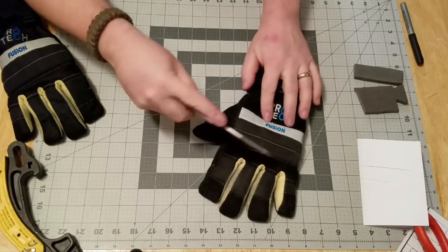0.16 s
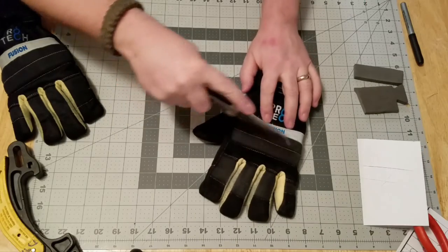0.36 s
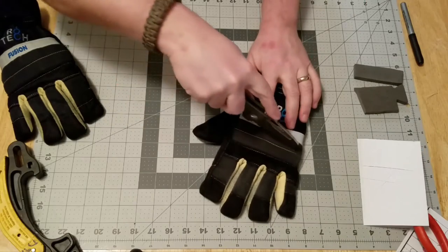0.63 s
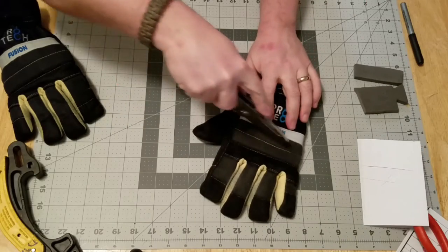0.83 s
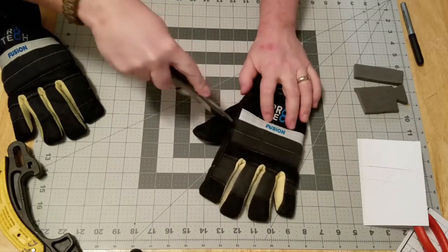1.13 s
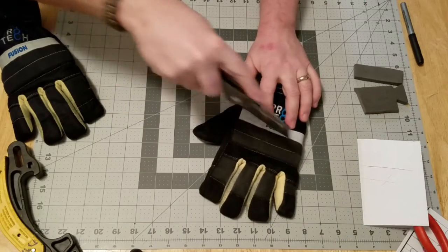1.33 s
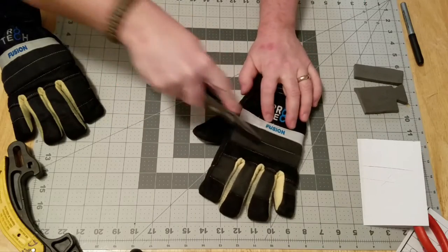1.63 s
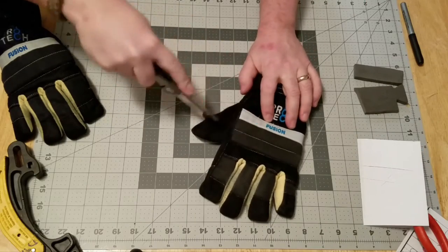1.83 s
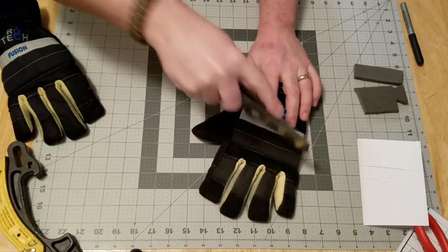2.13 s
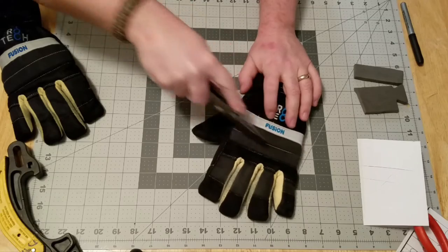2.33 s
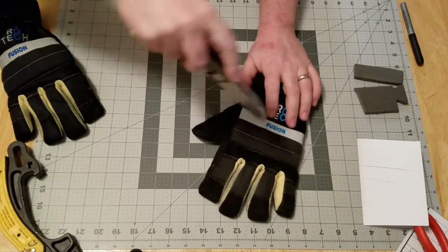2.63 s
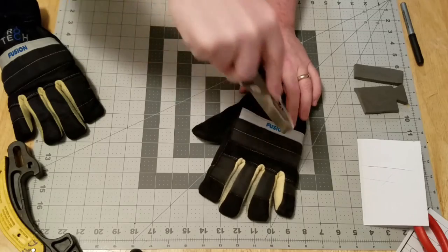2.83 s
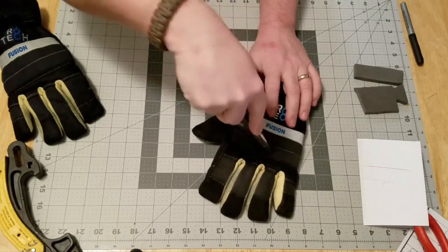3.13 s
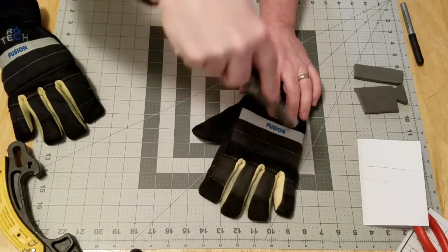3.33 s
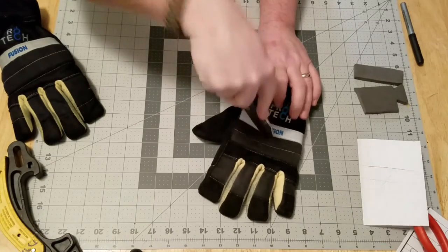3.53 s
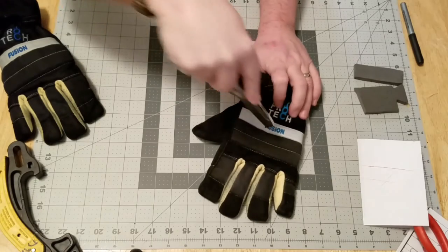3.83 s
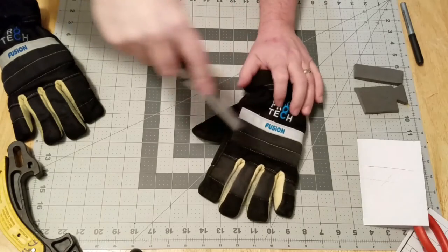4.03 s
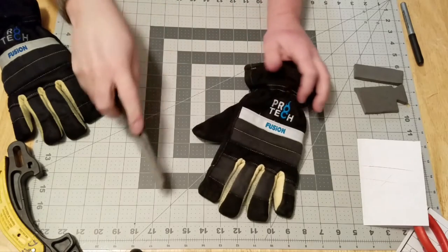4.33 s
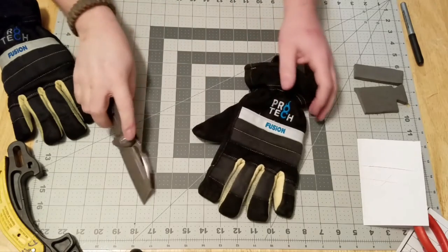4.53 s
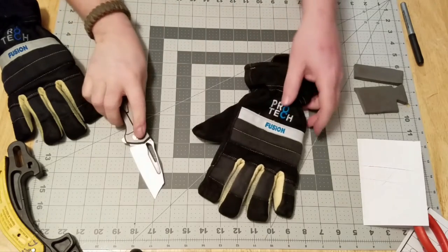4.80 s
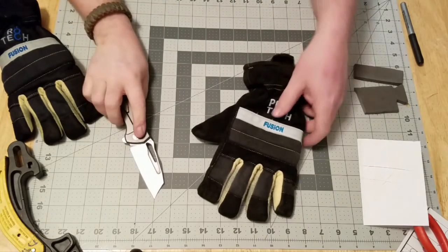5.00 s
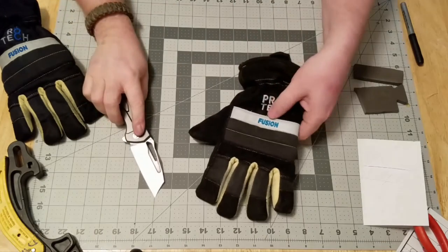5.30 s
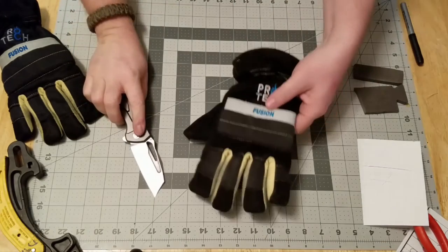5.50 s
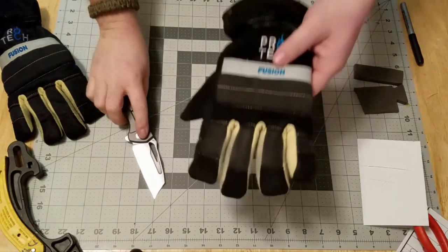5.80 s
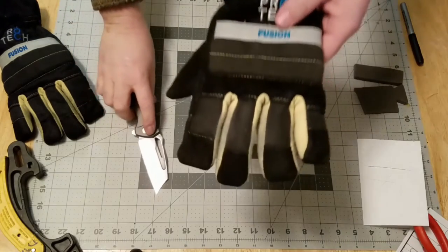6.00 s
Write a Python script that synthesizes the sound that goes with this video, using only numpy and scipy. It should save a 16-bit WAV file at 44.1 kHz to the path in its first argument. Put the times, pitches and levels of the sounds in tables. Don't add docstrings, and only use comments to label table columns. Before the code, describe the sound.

A small, dull indoor room with a steady low fan and faint mains hum, heard through a close stereo microphone. Slight handling and a faint tick occur in the first half second. At about 0.9 to 1.2 seconds a knife edge drags over a padded glove: a coarse, hollow rasp with fine fibre hiss, a buzzing zip and small knocks. A second stroke at 1.65 to 1.95 zips up sharply in pitch and bumps harder; a third, slightly softer, comes at 2.3 to 2.65. At 3.05 a stab lands, the loudest blow, a blunt crack with table boom and brief metallic ring. A second stab follows at 3.63, with little scuffs after each. Quiet handling leads to 4.77, when the knife is set down, clicking and rocking until about 5.0. Soft glove rustles follow, growing gently near 6 seconds with a light bump.

```python
import sys
import numpy as np
from scipy import signal
from scipy.fft import rfft, irfft
from scipy.io import wavfile

SR = 44100
rng = np.random.default_rng(int(sys.argv[2]) if len(sys.argv) > 2 else 0)


def decibels_to_gain(level_db):
    exponent = np.asarray(level_db, float) / 20
    return 10 ** exponent


def to_wav(s):
    ch = np.atleast_2d(s).T
    pcm = np.round(np.clip(ch, -1, 1) * 32767)
    wavfile.write(sys.argv[1], SR, pcm.astype(np.int16))


N = 271361
LEFT_RIGHT = np.array([[1], [-1]])

# (frequency [Hz], side minus mid [dB])
FAR_SIDE = [(60, -8), (110, -16), (200, -10), (380, -9.5), (700, -4.5), (1290, 1), (2380, 1.5), (4400, 2.5),
            (8120, -0.5), (15000, 0.5)]
# (frequency [Hz], density [dB per Hz])
WEAVE_COLOUR = [(410, -26.5), (700, -5), (805, -3.5), (884, -7), (1210, -4.5), (1460, -4.5), (1950, -7.5),
                (2200, -8), (6500, -25.5), (8450, -26), (14300, -120)]
# (frequency [Hz], density [dB per Hz])
EDGE_COLOUR = [(2350, -60), (4000, -20), (4390, -5), (6330, -8), (6820, -11), (8600, -2), (10000, -4),
               (15100, -4.5), (16000, -29)]


def rms_one(x):
    return x / np.sqrt(np.mean(x ** 2) + 1e-20)


def colour(x, points):
    hz, db = np.transpose(points)
    grid = np.fft.rfftfreq(8192, 1 / SR) + 1
    log_gain = np.interp(np.log(grid), np.log(hz), db) * np.log(10) / 20
    cepstrum = irfft(log_gain)
    cepstrum[1:4096] *= 2
    cepstrum[4097:] = 0
    response = irfft(np.exp(rfft(cepstrum)))
    return signal.fftconvolve(x, response)[:N]


def drift(rate_hz):
    r = np.exp(-80 * np.pi * rate_hz / SR)
    noise = rng.standard_normal(N // 40 + 2002)
    slow = signal.lfilter([1], [1, -2 * r, r * r], noise)[2000:]
    return np.interp(np.arange(N) / 40, np.arange(len(slow)), rms_one(slow))


def ring(x, hz, t60_s):
    r, w = decibels_to_gain(-60 / (t60_s * SR)), 2 * np.pi * hz / SR
    return signal.lfilter([0, np.sin(w)], [1, -2 * r * np.cos(w), r * r], x + 1e-18)


def grains(per_s, spread_db):
    heights = decibels_to_gain(spread_db * np.minimum(rng.exponential(1, N), 4))
    sizes = heights * rng.choice([-1, 1], N)
    return rms_one(sizes * (rng.random(N) < per_s / SR))


def swell(peak_s, db, rise_s, fall_s):
    t = np.arange(N) / SR - peak_s
    return decibels_to_gain(db - 30 * np.maximum(-t / max(rise_s, .005), t / max(fall_s, .005)))


def fan_noise():
    # (frequency [Hz], density [dB per Hz])
    fan_colour = [(20, -27), (45, -32), (70, -12.5), (100, -13.5), (135, 0), (185, -9), (240, -5),
                  (400, -8.5), (600, -11.5), (1100, -14.5), (2500, -20), (4600, -31), (9000, -37),
                  (15500, -31.5)]
    mid, side = rng.standard_normal((2, N))
    mid = colour(mid, fan_colour)
    side = colour(colour(side, fan_colour), FAR_SIDE)
    level = decibels_to_gain(-60 + 0.95 * drift(4.4)) / np.std(mid[9000:])
    return level * (mid + side * LEFT_RIGHT)


def hum():
    # (frequency [Hz], level [dB rms])
    hum_tones = [(59.2, -75), (129.2, -71.5), (242.2, -73.5), (360.7, -73), (479.1, -74), (2099, -80),
                 (2433, -70.5), (2864, -77.5), (4867, -85)]
    t = np.arange(N) / SR
    tones = 0
    for hz, db in hum_tones:
        turn = 2 * np.pi * hz * t + 1.01 * hz / 1000 * drift(1.44) + rng.uniform(0, 7.93)
        gain = np.sqrt(2) * decibels_to_gain(db + 2.15 * drift(0.76))
        tones = tones + gain * np.sin(turn + LEFT_RIGHT * 0.42 * hz / 1000)
    return tones


def room(x):
    t60_s, tail_db, wall_cut_hz = 0.23, -10.5, 7800
    t = np.arange(int(.5 * SR)) / SR
    common, own = rng.standard_normal((2, len(t))) * decibels_to_gain(-60 * t / t60_s) * (t > .006)
    dull = signal.lfilter(*signal.butter(1, wall_cut_hz, fs=SR), x)
    mid, side = (signal.fftconvolve(dull, h / np.linalg.norm(h))[:N] for h in (common, own))
    return decibels_to_gain(tail_db) * (mid + colour(side, FAR_SIDE) * LEFT_RIGHT)


def ports(x):
    # (frequency [Hz], side minus mid [dB])
    near_side = [(60, -18), (110, -7), (200, -16), (380, -9), (700, -11), (1290, 0), (2380, 0), (4400, 1),
                 (8120, 2.5), (15000, 3.5)]
    scattered = x
    for lag in (11, 29, 67, 131):
        echo = np.r_[-.55, np.zeros(lag - 1), 1]
        scattered = signal.lfilter(echo, echo[::-1], scattered + 1e-18)
    return x + decibels_to_gain(-4.0) * colour(scattered, near_side) * LEFT_RIGHT


def table_thuds():
    # (frequency [Hz], level [dB], t60 [s])
    mode_groups = [
        [(74.6, -2.5, 0.18), (95.6, 2, 0.21)],
        [(153.5, 1, 0.079), (170, -6.5, 0.056), (209.5, 4, 0.14), (246, -6.5, 0.07)],
        [(311.5, 1.5, 0.04), (335, 4.5, 0.11)],
        [(520, -45, 0.013), (568, -1.5, 0.041), (630, -0.5, 0.025), (820, 1.5, 0.033), (910, -14, 0.089),
         (1004, -10.5, 0.059)],
    ]
    # (time [s], low modes [dB], deep, middle and high modes [dB re low])
    stroke_pushes = [(0.107, -68.5, -8, -8, 20.5), (0.199, -62, -10, 7, 8), (1.013, -73, -5, 5, 21),
                     (1.051, -68.5, 0, 27, 32), (1.109, -65, -10, 4, 15), (1.18, -57, -8, -4, -1),
                     (1.208, -49, -9, -4, -8), (1.229, -47.5, -8, -6, -12), (1.565, -48, -15, -6, -11),
                     (1.825, -44.5, -14, -5, 5), (1.834, -43, -7, -5, -8), (1.937, -52.5, -5, -9, 7),
                     (2.315, -41.5, -19, -2, -3), (2.321, -59, -18, -13, -11), (2.494, -67, -7, -6, 17),
                     (2.574, -49, -10, -6, -7), (2.654, -58, -10, -5, 0)]
    stab_pushes = [(3.047, -37.5, -10, 3.5, -1.5), (3.053, -34, -20, 2, 8.5), (3.061, -48.5, 0, 16.5, -4),
                   (3.069, -34.5, -5.5, -1, -19), (3.247, -65, -11, -6, 7), (3.625, -42.5, -14, 6.5, 6.5),
                   (3.638, -36, -10.5, -2, 2.5), (3.646, -48, -16, -1, 14), (3.838, -75, -9, -1, -7)]
    laying_pushes = [(4.772, -38, -20, -13, -6), (4.788, -47.5, -19, -17, -4.5), (4.86, -45.5, -18, -4, -5),
                     (4.903, -56, -22, -23, -29), (4.912, -41.5, -20, -12.5, -5.5),
                     (5.035, -58, -14, 11.5, -9), (5.219, -54, -9, 0.5, -2), (5.975, -60.5, -15, 6, 9.5),
                     (6.03, -51, -14, 0.5, -10)]
    push_hz = 1220
    s, peak_db, deep_db, middle_db, high_db = np.vstack([stroke_pushes, stab_pushes, laying_pushes]).T
    group_db = [deep_db, 0, middle_db, high_db]
    at = np.round((s + .0008) * SR).astype(int)
    own_db = rng.normal(0, 2, (len(s), 14))
    modes = [(g, mode) for g, group in enumerate(mode_groups) for mode in group]
    out = np.zeros((2, N))
    for k, (g, (hz, db, t60_s)) in enumerate(modes):
        push = np.zeros(N)
        push[at] = decibels_to_gain(peak_db + group_db[g] + db + own_db[:, k])
        sign = -1 if g == 3 else (-1) ** k
        out[g // 3] += sign * ring(push, hz, t60_s)
    boom_band = signal.butter(2, [45, push_hz], "band", fs=SR, output="sos")
    knock_band = signal.butter(2, [260, push_hz], "band", fs=SR, output="sos")
    return decibels_to_gain(-3) * (signal.sosfilt(boom_band, out[0]) + signal.sosfilt(knock_band, out[1]))


def handle_rocking():
    # (time [s], peak [dB])
    rocks = [(4.771, -45), (4.794, -57), (4.861, -57), (4.912, -59.5), (4.994, -54)]
    # (frequency [Hz], level [dB], t60 [s])
    handle_modes = [(1590, -4, .03), (2000, -14, .03), (2600, -2, 0.037), (3470, -1.5, 0.027),
                    (3780, -1, 0.027), (4750, -12, .03)]
    out, touches = np.zeros(N), rng.standard_normal((len(rocks), len(handle_modes), 3))
    for k, (hz, db, t60_s) in enumerate(handle_modes):
        clicks = np.zeros(N)
        for (s, peak_db), touch in zip(rocks, touches):
            clicks[round(s * SR) + np.array([20, 90, 200])] = decibels_to_gain(peak_db + db) * touch[k]
        out += ring(clicks, hz, 0.5 * min(t60_s, .08))
    return decibels_to_gain(-6.0) * out


def blade_blows():
    # (time [s], peak [dB], bright part [dB], tearing hiss [dB])
    contacts = [(0.418, -59.5, 0.5, -3), (1.053, -43, -37, -24), (1.181, -34.5, -28, -21),
                (1.208, -37, -19, -14), (1.57, -50, -20, -13), (1.808, -35, -17, -22),
                (1.824, -53, -13, -11), (1.833, -42, -3.5, -7.5), (1.868, -36, -20, -24),
                (1.937, -42, -16, -20), (2.3168, -44.5, -29, -15), (2.444, -47.5, -4.5, -17),
                (2.574, -37, -5, -13), (2.649, -39, -10, -18), (3.0462, -35, -21, -11),
                (3.0533, -24, -11, -15), (3.0624, -28, -23, -10.5), (3.069, -30.5, -15, -11),
                (3.222, -50, -10, -4), (3.242, -48, -13, -17), (3.6242, -42, -20, -8),
                (3.631, -43, -22, -4), (3.6379, -27.5, -17, -9), (3.6412, -31.5, -21, -12),
                (3.645, -34.5, -23, -16), (3.833, -55, -13, -7), (4.7705, -43.5, -5, -6),
                (4.794, -51, -9, -17), (4.86, -48, -12, -22), (4.912, -48, -13, -10)]
    # (frequency [Hz], level [dB], t60 [s])
    knife_modes = [(1400, -30.5, 0.039), (1667, 1.5, 0.22), (2260, -8, 0.035), (2900, -29, 0.063),
                   (3870, -56, 0.06), (3860, -32, 0.068), (4760, -13.5, 0.076), (5190, -10, 0.016),
                   (5367, -47, 0.036), (5400, -35, 0.072), (7600, -22, 0.13), (8549, -39, 0.67),
                   (9400, 12.5, 0.055), (9340, -23.5, 0.17), (10100, -37, 0.14), (10700, -30, 0.08)]
    contact_s, tear_rise_s, bright_hz = 0.0065, 0.00065, 2660
    dull, bright, tear = np.zeros((3, N))
    t = np.arange(int(.1 * SR)) / SR
    rough, fine = grains(per_s=4000, spread_db=3.5), grains(per_s=16000, spread_db=2.5)
    for s, peak_db, bright_db, hiss_db in contacts:
        i = round((s + 0.001016) * SR)
        span = slice(i, i + len(t))
        dying = decibels_to_gain(peak_db) * np.exp(-t / contact_s)
        rattle = dying * rough[span]
        rattle[0] = 2.2 * dying[0]
        dull[span] += rattle
        bright[span] += decibels_to_gain(bright_db + 10.5) * rattle
        tear[span] += decibels_to_gain(hiss_db) * dying * (1 - np.exp(-t / tear_rise_s)) * fine[span]
    low, high = (signal.butter(2, bright_hz, kind, fs=SR, output="sos") for kind in ("low", "high"))
    rattle = signal.sosfilt(low, dull) - signal.sosfilt(high, bright)
    knife = np.zeros(N)
    for k, (hz, db, t60_s) in enumerate(knife_modes):
        drive = rattle if hz < 6000 else decibels_to_gain(-7.0) * tear
        knife += decibels_to_gain(db) * ring(drive, hz, 0.49 * min(t60_s, .1)) * (-1) ** k
    crack = colour(rattle, WEAVE_COLOUR) / np.std(colour(fine, WEAVE_COLOUR))
    puff = colour(tear, EDGE_COLOUR) / np.std(colour(fine, EDGE_COLOUR))
    return decibels_to_gain(-37) * knife + decibels_to_gain(-9.0) * crack + decibels_to_gain(-5.5) * puff


def hand_pressure():
    # (peak time [s], padding [dB], weave [dB re padding], rise [s], fall [s])
    moves = [(.114, -68, 0, .15, 0.17), (4.39, -66, -8, 0.7, .1), (5.04, -62.5, -5, 0.66, 0.13),
             (5.235, -60, 3.5, .5, .8), (6.07, -61, -4, 1, 0.49)]
    body, rasp = np.zeros((2, N))
    for s, db, weave_db, rise_s, fall_s in moves:
        gain = swell(s, db, rise_s, fall_s)
        body += gain
        rasp += decibels_to_gain(weave_db) * gain
    lift_hiss = swell(5.9, -72, rise_s=1.2, fall_s=1.2)
    return np.array([body, rasp, lift_hiss])


def catch_pressure():
    # (peak time [s], weave [dB], padding [dB re weave], hiss [dB re weave], fall [s])
    seams = [(.97, -66.5, 9, -3, 0.13), (1.014, -67.5, 18, -19, .05), (1.75, -59.5, 13.5, -10, 0.075),
             (1.81, -53, 10.5, -14, 0.052), (2.38, -71, 10, -1, 0.14), (3.66, -61, -6, -4, 0.065),
             (1.187, -49.5, -1, -17, 0.086), (1.209, -45.5, -4, -14, .13), (1.827, -51.5, 16.5, -21, 0.028),
             (1.871, -47, -2.5, -15, .13), (1.94, -51, 5, -20, 0.13), (2.502, -58, 8.5, -26, 0.052),
             (2.58, -42.5, 0, -15, 0.12), (2.66, -50, 3, -21, 0.11), (3.246, -54.5, -1, 0, 0.065)]
    body, rasp, hiss = np.zeros((3, N))
    for s, db, body_db, hiss_db, fall_s in seams:
        gain = swell(s, db, 0.037, fall_s)
        body += decibels_to_gain(body_db) * gain
        rasp += gain
        hiss += decibels_to_gain(hiss_db) * gain
    return np.array([body, rasp, hiss])


def drag_pressure():
    # (peak time [s], padding [dB], edge hiss [dB re padding], rise [s], fall [s])
    strokes = [
        (1.06, -40, -24, 0.075, 0.17),
        (1.777, -40.5, -18, .15, 0.051),
        (2.47, -44, -19.5, 0.13, 0.11),
    ]
    weave_db, hiss_hold_db = -11, 5.5
    lingers = 1.55
    body, rasp, hiss = np.zeros((3, N))
    for s, db, hiss_db, rise_s, fall_s in strokes:
        body += swell(s, db, rise_s, fall_s)
        rasp += swell(s, db + weave_db, 1.94 * rise_s, 0.96 * fall_s)
        hiss_swell = swell(s, db + hiss_db + hiss_hold_db, lingers * rise_s, lingers * fall_s)
        hiss += np.minimum(hiss_swell, decibels_to_gain(db + hiss_db))
    return np.array([body, rasp, hiss])


def padding(gain):
    # (frequency [Hz], width [Hz], level [dB])
    glove_modes = [(163, 71, -16), (218, 5.4, -14), (340, 33, -7.5), (466.6, 46, 1), (528, 77, 3.5),
                   (590, 61, 2), (806, 93, -8.5), (1060, 170, -11)]
    slips = grains(per_s=900, spread_db=2.5) * decibels_to_gain(2.35 * drift(28))
    body = np.zeros(N)
    for k, (hz, width_hz, db) in enumerate(glove_modes):
        body += decibels_to_gain(db) * np.sqrt(width_hz) * ring(slips, hz, 1.87 / width_hz) * (-1) ** k
    return gain * rms_one(body)


def rib_zips():
    # (start [s], end [s], first ribs per second [Hz], last ribs per second [Hz], last level [dB])
    runs = [
        (0.927, 1.051, 720, 860, -55.5),
        (1.65, 1.795, 700, 1800, -55.5),
        (2.348, 2.478, 750, 1480, -59),
    ]
    start_db, growth = -22, 4.5
    t, pitch, gain = np.arange(N) / SR, np.zeros(N), np.zeros(N)
    for start, end, first_hz, last_hz, db in runs:
        done = np.clip((t - start) / (end - start), 0, 1)
        fade = np.clip(np.minimum(t - start, end - t) * 100, 0, 1)
        pitch += (fade > 0) * first_hz * (last_hz / first_hz) ** done
        gain += fade * decibels_to_gain(db + start_db * (1 - done) ** growth)
    turn = 2 * np.pi * np.cumsum(pitch) / SR
    return gain * (drift(90) * np.cos(turn) + drift(160) * np.sin(turn))


def edge_on_glove():
    body, rasp, hiss = drag_pressure() + catch_pressure() + hand_pressure()
    weave = rms_one(colour(grains(per_s=7000, spread_db=3.0), WEAVE_COLOUR)) * decibels_to_gain(2.0 * drift(63))
    edge = rms_one(colour(grains(per_s=17000, spread_db=4.5), EDGE_COLOUR)) * decibels_to_gain(1.4 * drift(40))
    cloth = decibels_to_gain(-3.5) * rasp * weave + decibels_to_gain(-3.0) * hiss * edge
    return decibels_to_gain(-2.5) * padding(body) + cloth + decibels_to_gain(-0.5) * rib_zips()


def scene():
    near = table_thuds() + handle_rocking() + blade_blows() + edge_on_glove()
    return fan_noise() + hum() + room(near) + ports(near)


def roll_off(x):
    return signal.sosfilt(signal.butter(12, 16570, fs=SR, output="sos"), x)


def record(dry):
    cutoff_hz, left_db, offset = 15850, -1.02, -0.00048
    top_cut = signal.cheby2(12, 50, cutoff_hz + 250, fs=SR, output="sos")
    mix = signal.sosfilt(top_cut, dry) * decibels_to_gain(left_db * LEFT_RIGHT) + offset
    return roll_off(mix)


dry = scene()
out = record(dry)
to_wav(out)
```